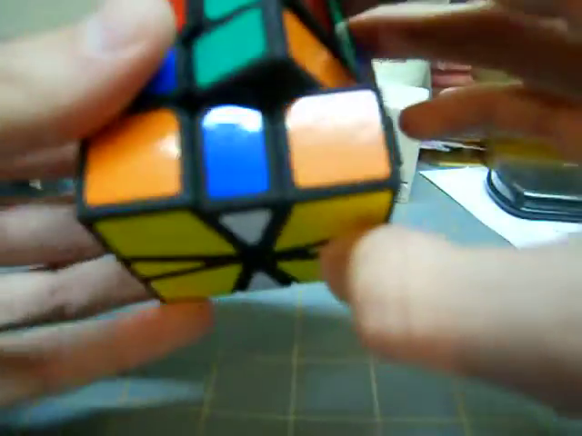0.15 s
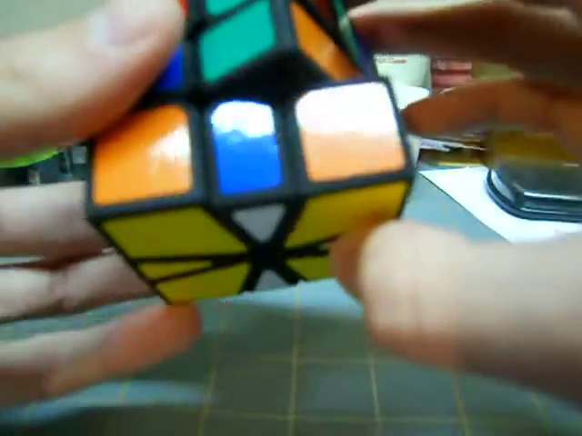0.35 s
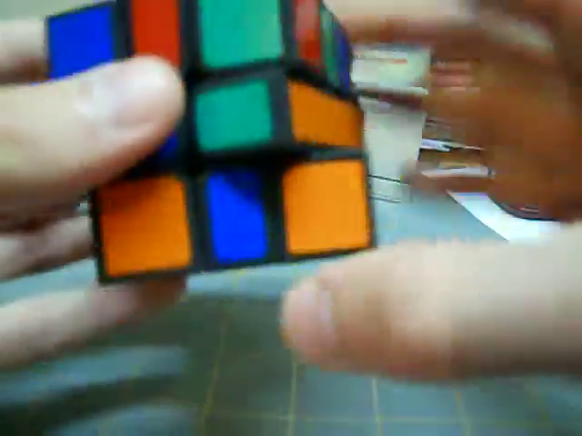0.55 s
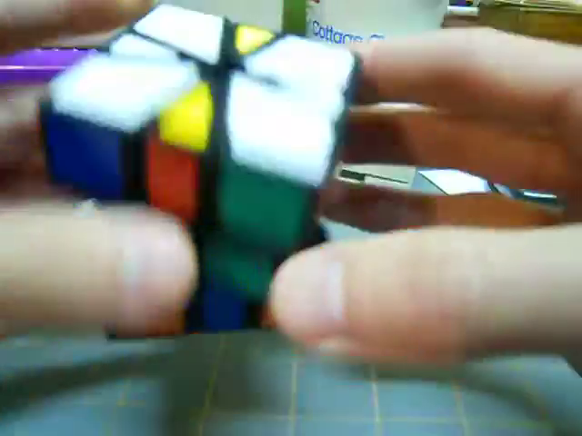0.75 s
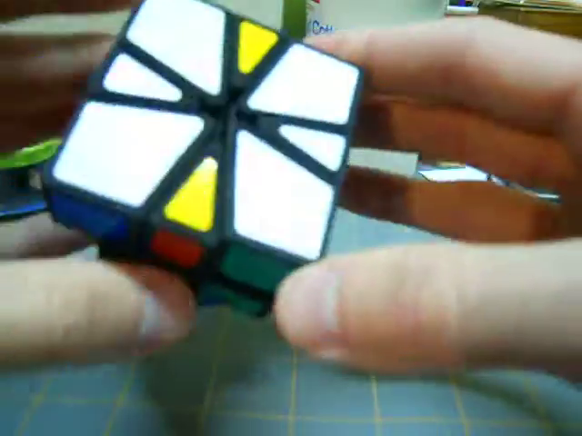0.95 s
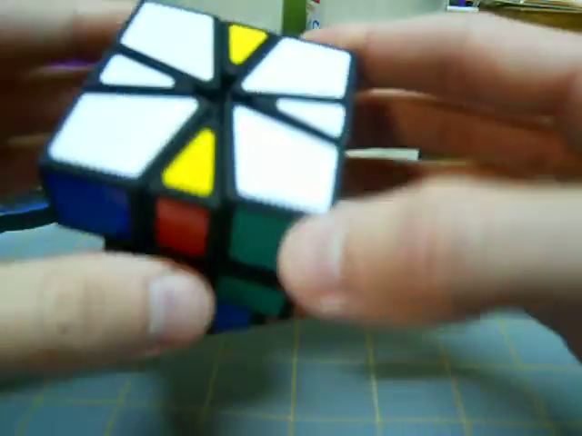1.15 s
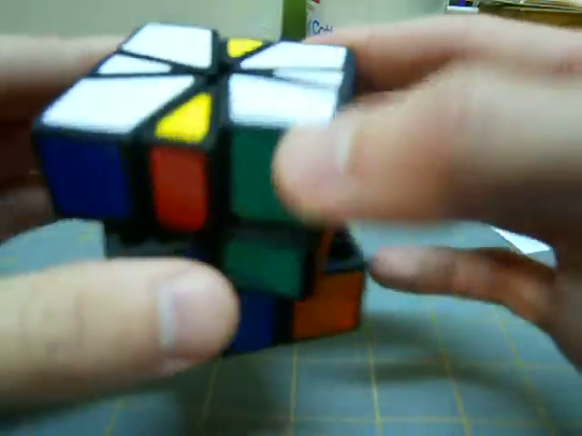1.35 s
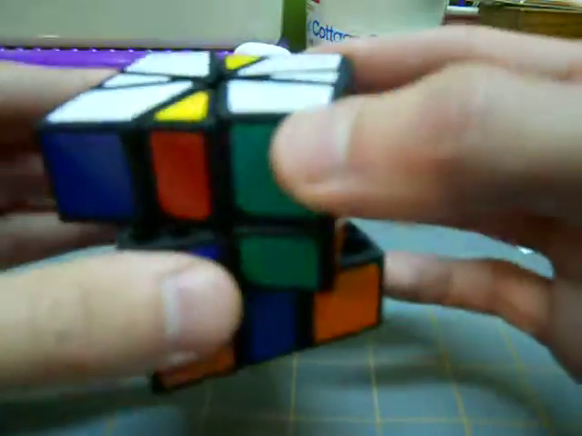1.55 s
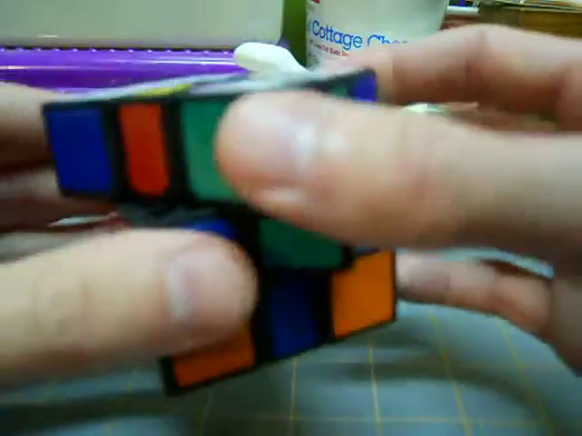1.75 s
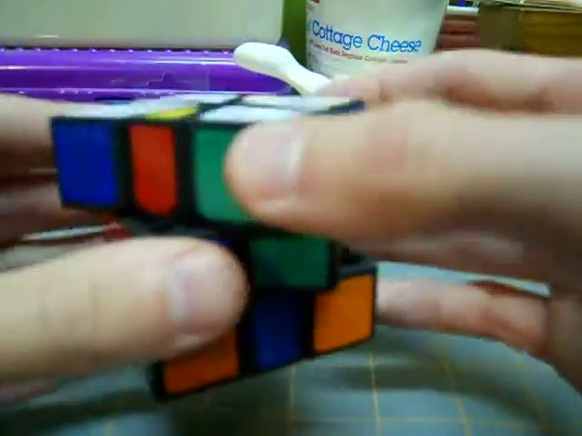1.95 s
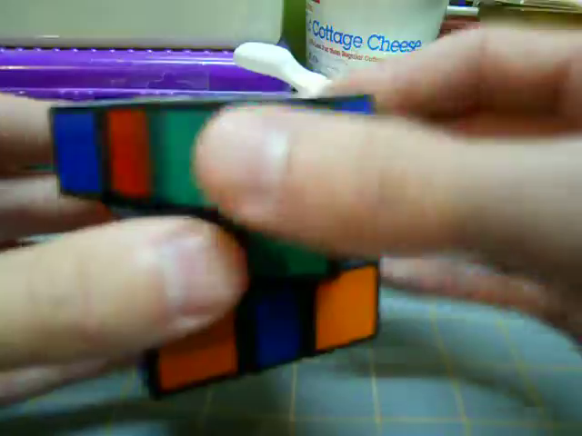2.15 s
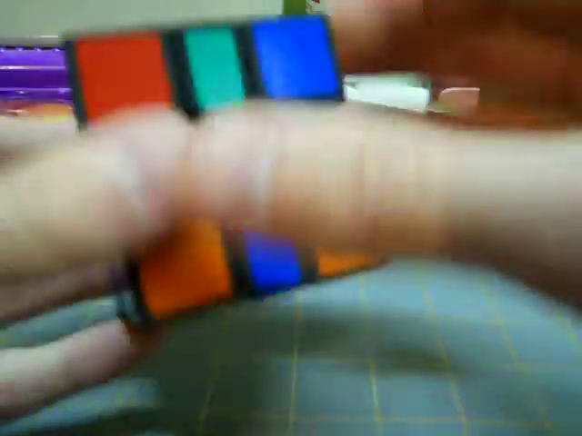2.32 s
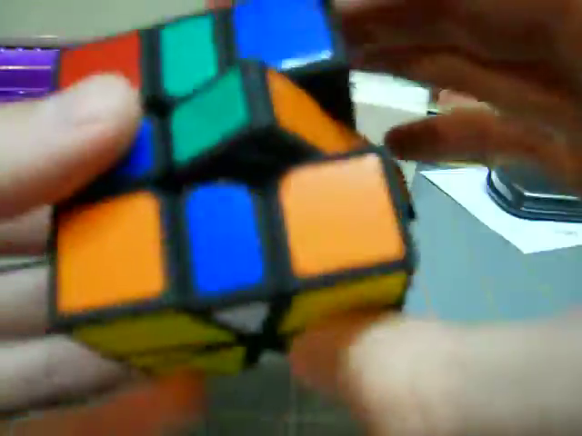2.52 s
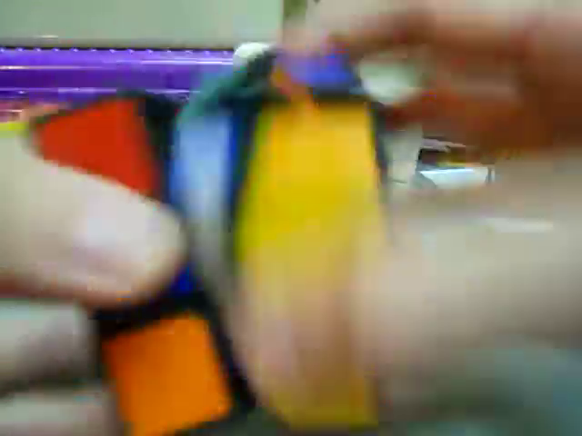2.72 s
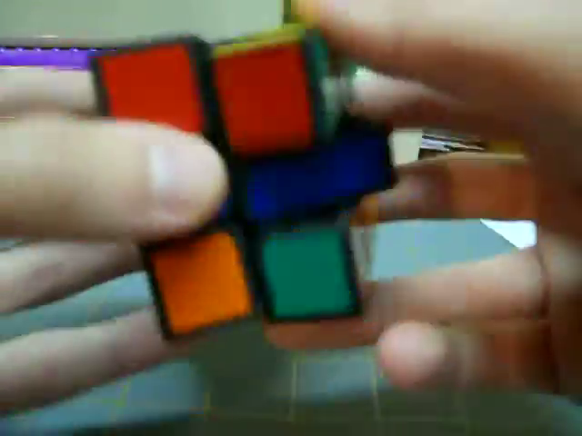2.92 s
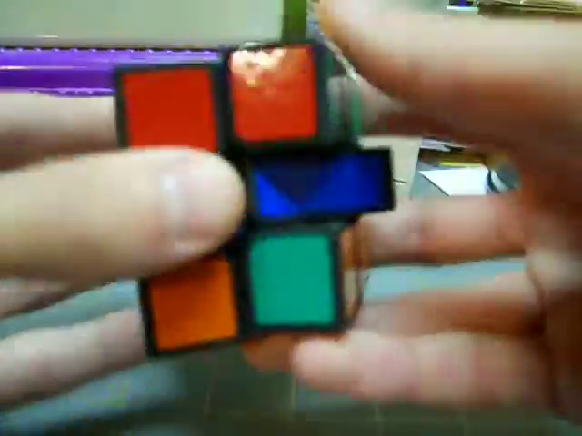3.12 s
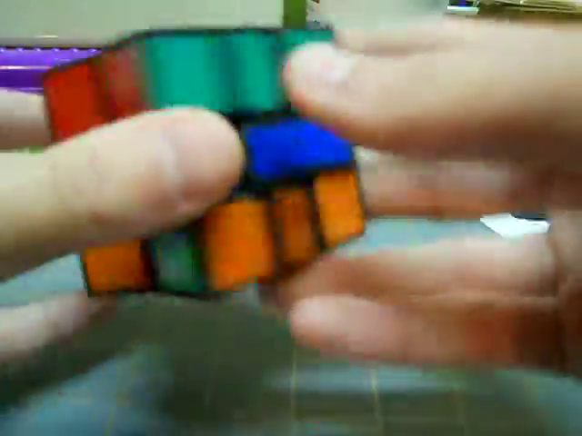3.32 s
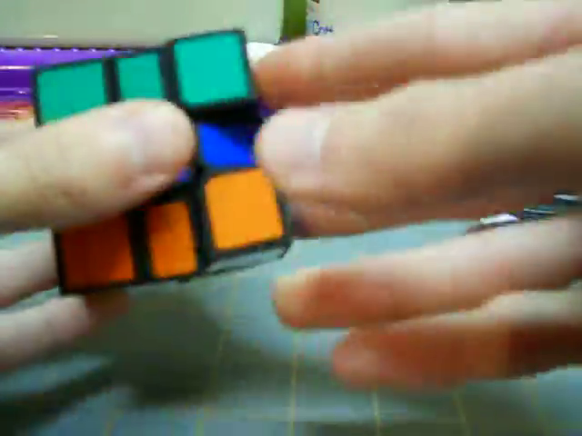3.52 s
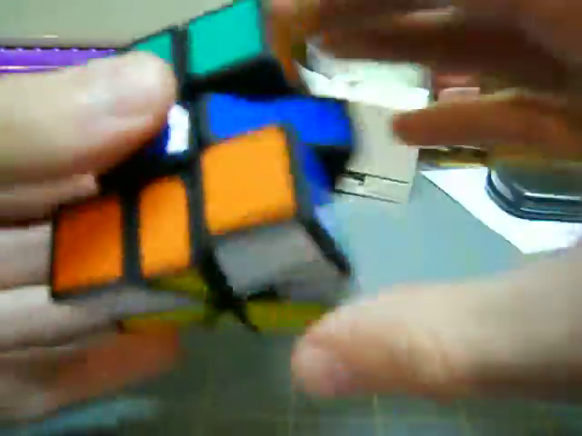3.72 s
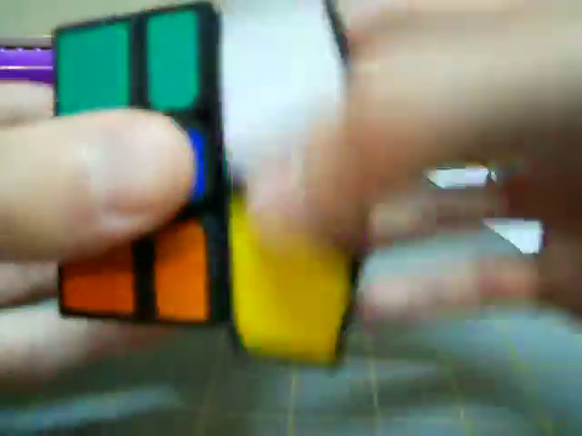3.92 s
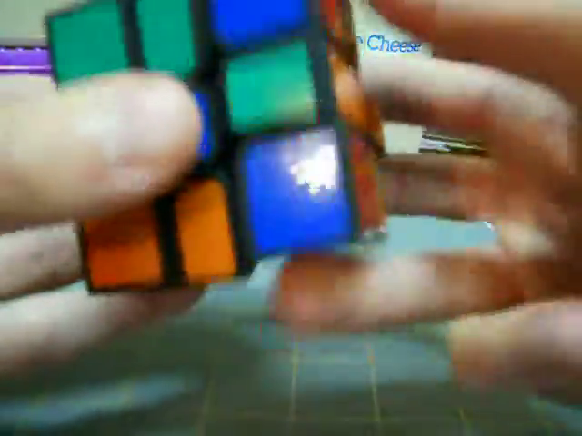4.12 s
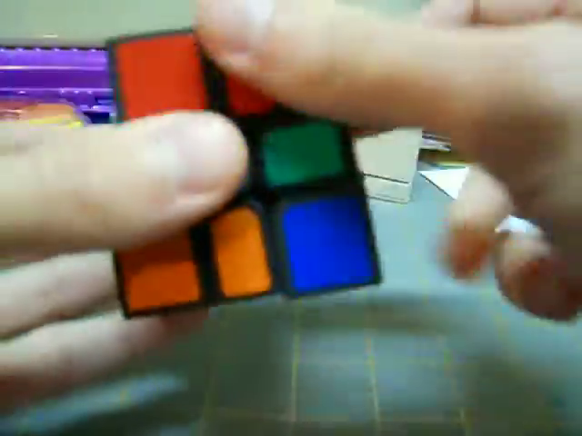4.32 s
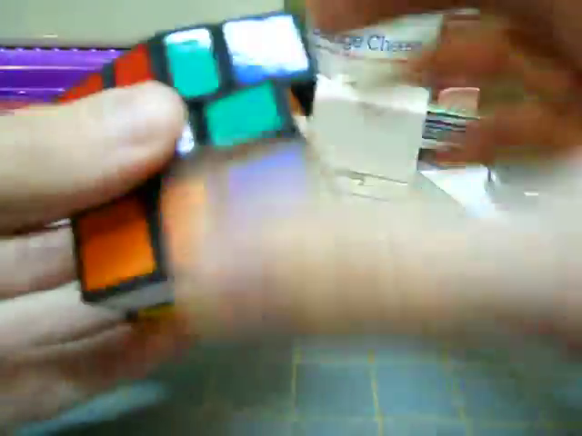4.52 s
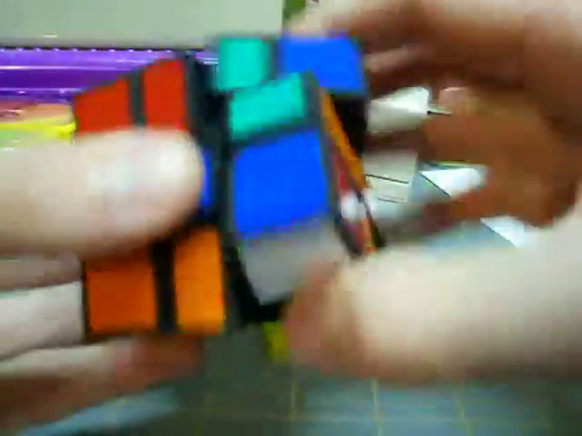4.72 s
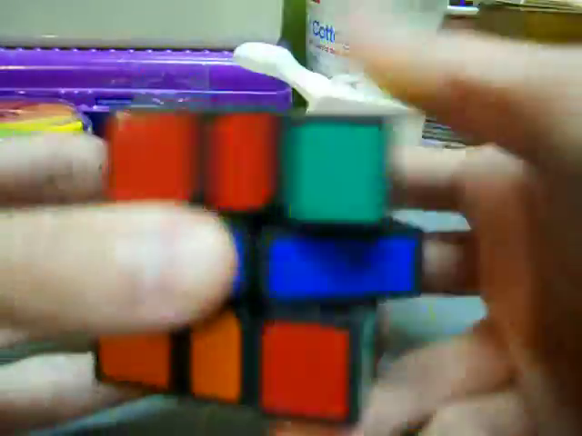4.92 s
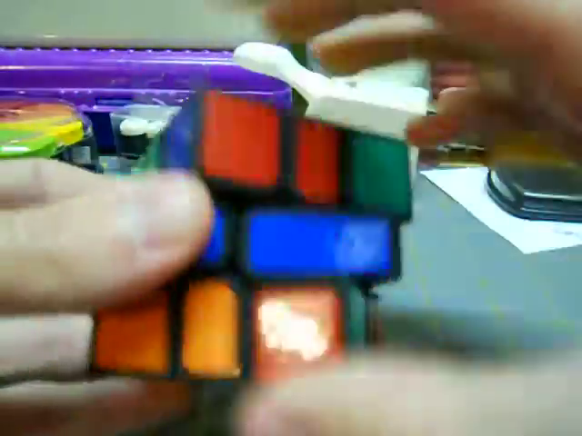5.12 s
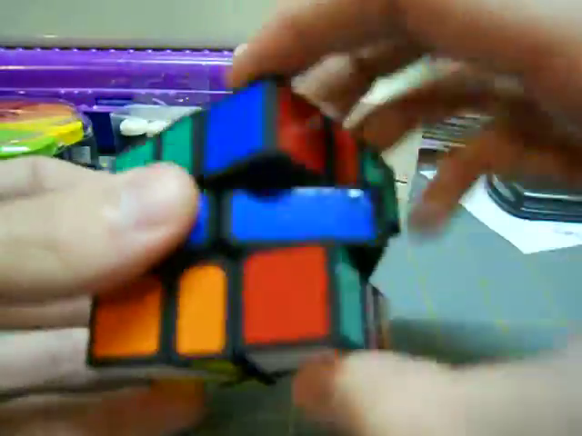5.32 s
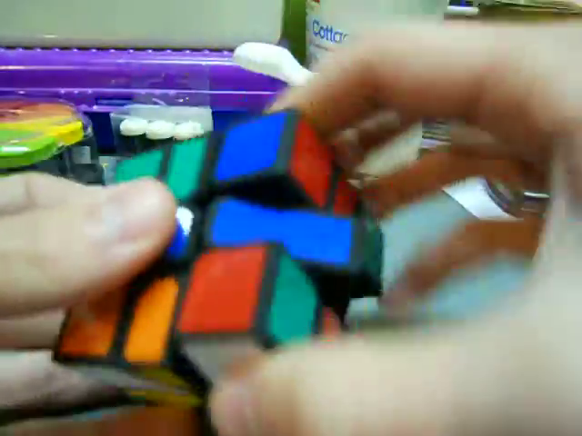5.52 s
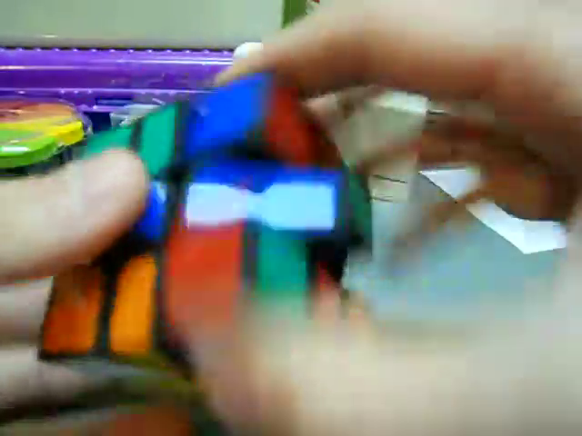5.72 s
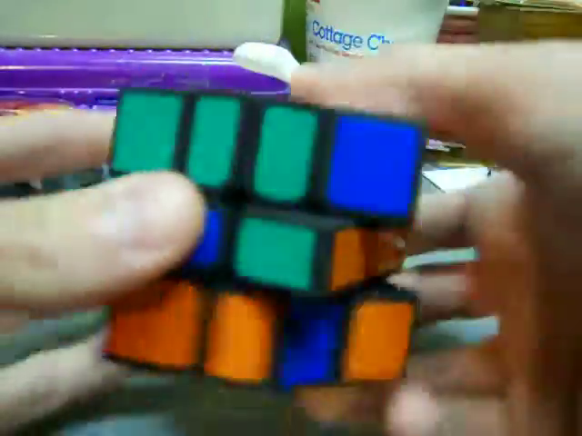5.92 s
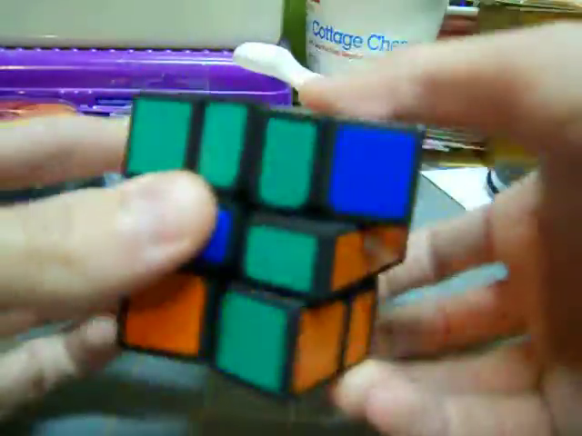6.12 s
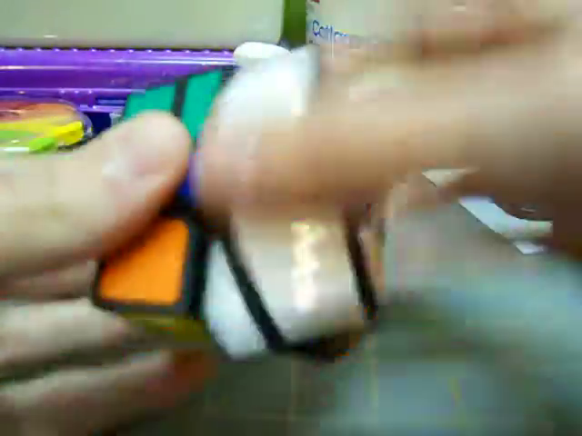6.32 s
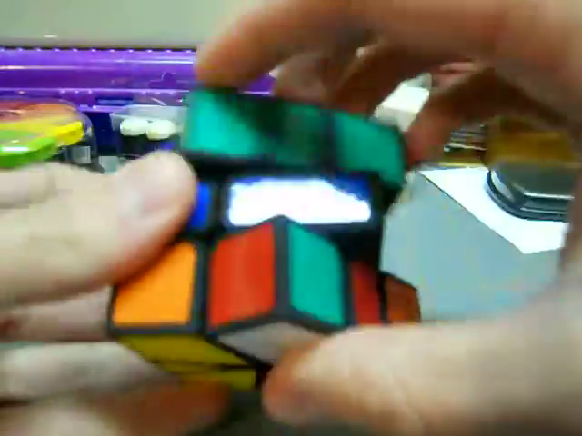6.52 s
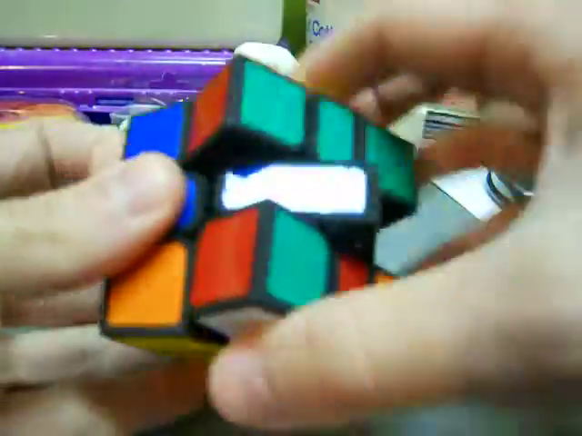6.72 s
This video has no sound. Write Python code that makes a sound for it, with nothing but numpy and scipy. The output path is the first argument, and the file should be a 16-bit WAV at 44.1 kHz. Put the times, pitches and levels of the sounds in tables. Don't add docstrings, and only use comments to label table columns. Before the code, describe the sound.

A hollow plastic twisty puzzle is turned by hand, quiet ticks growing into rapid scrapes, clacks and sharp snaps over faint, shifting hiss and hum.

```python
import sys
import numpy as np
from scipy import signal
from scipy.fft import rfft, irfft, next_fast_len
from scipy.io import wavfile
from scipy.ndimage import uniform_filter1d, map_coordinates

SR = 44100
rng = np.random.default_rng(int(sys.argv[2]) if len(sys.argv) > 2 else 0)


def decibels_to_gain(level_db):
    exponent = np.asarray(level_db, float) / 20
    return 10 ** exponent


def inscribe(sig):
    pcm = np.round(np.clip(np.atleast_2d(sig).T, -1, 1) * 32767)
    wavfile.write(sys.argv[1], SR, pcm.astype(np.int16))


N = 298116

# time_s, level_db
GAIN = [(0, -69.5), (0.45, -72), (0.68, -67.5), (0.92, -60), (1.6, -58.5), (2.11, -57.5), (2.33, -62),
        (2.61, -61.5), (2.941, -66), (3.5, -65.5), (4.1, -66.5), (4.54, -63), (4.86, -61), (5.33, -62.5),
        (5.55, -64.5), (6.12, -66), (6.76, -66.5)]
# frequency_hz, level_db
BAND = [(300, -10.5), (900, 0), (7500, -1), (8000, -17.5), (8500, -15.5), (8950, -30.5), (9200, -44.5),
        (9450, -90)]


def unit(x):
    return x / np.sqrt(np.mean(x ** 2) + 1e-20)


def along(points, hz):
    f, value = np.transpose(points)
    return np.interp(np.log(hz + 1), np.log(f + 1), value)


def wobble(rate_hz):
    knots = rng.standard_normal(N // 20 + 4)
    return map_coordinates(knots, [np.arange(N) * min(rate_hz, 2000) / SR])


def filtered(x, response):
    size = next_fast_len(N + 8192)
    return irfft(rfft(x, size) * response(np.fft.rfftfreq(size, 1 / SR)), size)[..., :N]


def ring(x, modes):
    def bank(f):
        total = 0
        for k, (centre, width, db) in enumerate(modes):
            resonance = 1j * f * width / (centre * centre - f * f + 1j * f * width)
            total = total + (-1) ** k * decibels_to_gain(db) * resonance
        return total / np.sqrt(np.mean(abs(total) ** 2))
    return filtered(x, bank)


def floor():
    # frequency_hz, density_db_per_hz
    hiss_spectrum = [(20, -7), (60, -7), (200, -8.5), (700, -9), (2000, -13), (4000, -14.5), (7400, -17.5)]
    # frequency_hz, width_hz, level_over_floor_db
    hum_hz, hum_width_hz, hum_db = (62, 4.3, 1.1)
    hum_growth = 1.3
    t = np.arange(N) / SR
    gain_s, gain_db = np.transpose(GAIN)
    hiss = unit(filtered(rng.standard_normal(N), lambda f: decibels_to_gain(along(hiss_spectrum, f))))
    hiss_level = decibels_to_gain(13.5 + 0.9 * wobble(7.9))
    beat = np.sin(2 * np.pi * hum_hz * t + .4 * wobble(hum_width_hz))
    extra_db = (hum_growth - 1) * np.interp(t, gain_s, gain_db - gain_db.mean())
    hum = decibels_to_gain(hum_db + extra_db + .6 * wobble(6.5)) * beat
    return decibels_to_gain(np.interp(t, gain_s, gain_db)) * (hiss_level * hiss + hum)


def desk(x):
    t = np.arange(SR // 5) / SR
    tail = rng.standard_normal(len(t)) * decibels_to_gain(-60 * t / 0.098)
    return signal.fftconvolve(x, tail / np.linalg.norm(tail))[:N]


def body(force, hollow, edges):
    # time_s, thin_walls_db, edges_db, broad_walls_db, deep_cavities_db
    tilt = [(0.05, -2, -0.5, -2, 3.5), (.9, 0, 5, 4, -0.5), (1.6, 3, 0.5, -1, 2.5),
            (1.77, 0.5, 2, -2.5, 5.5), (2.24, 2.5, 1, -3, -3.5), (2.57, -2.5, 0, 4, 8.5),
            (2.79, -1.5, -1.5, 1, -4.5), (2.88, 0, -1.5, 0.5, -3), (3.37, -0.5, 1, -0.5, 2),
            (3.95, -0.5, -2, 0, -2), (4.29, 2, 2, 1.5, -1.5), (4.45, -5, -5.5, -5.5, 4),
            (4.87, 0, 0.5, 1.5, -6.5), (5.3, -2, 0, -2, 0), (5.6, -1.5, 0.5, -3, -2.5),
            (5.85, -3, -1, -4, -2.5), (6.08, 0.5, 5.5, 4, -1), (6.4, 0, 0.5, 1, -4.5)]
    # frequency_hz, width_hz, level_db
    cavity_modes = [(393, 320, -16), (621, 149, -6.5), (892, 192, -5), (1224, 344, -2), (1420, 240, 3),
                    (1900, 1140, -11.5)]
    thick_modes = [(2380, 680, -5), (3097, 450, 1.5)]
    thin_modes = [(3726, 530, 1), (4160, 723, -3)]
    edge_modes = [(4830, 2230, -4.5), (6510, 840, 0), (7630, 3240, -9)]
    time_s, *free_db = np.transpose(tilt)
    thin, fine, broad, deep = (decibels_to_gain(np.interp(np.arange(N) / SR, time_s, db)) for db in free_db)
    walls = ring(decibels_to_gain(-6.0) * broad * force, thick_modes[:1])
    walls = walls - decibels_to_gain(-0.3) * ring(force, thick_modes[1:])
    walls = walls + ring(decibels_to_gain(-4.0) * thin * force, thin_modes)
    cavities = ring(decibels_to_gain(-6.0) * deep * hollow, cavity_modes[:3])
    cavities = cavities - decibels_to_gain(-2.07) * ring(hollow, cavity_modes[3:])
    return walls + cavities + ring(fine * edges, edge_modes)


def snaps():
    # start_s, peak_db, pitch_hz, t60_ms
    blows = [(2.2084, -25, 3890, 12), (2.2419, -7.5, 4060, 11), (2.5706, -19.5, 2780, 19),
             (2.7568, -24, 3160, 12), (2.8923, -20, 3350, 12), (3.2737, -22, 3050, 12),
             (3.3852, -24.5, 2960, 12), (3.4851, -19, 2810, 13), (3.4977, -20.5, 3000, 12),
             (3.9357, -24, 3120, 12), (3.9468, -11, 2950, 12), (3.9594, -16.5, 3130, 14),
             (3.9914, -16.5, 3080, 14), (4.0198, -24, 3000, 13), (4.1668, -18.5, 3200, 14),
             (4.2651, -16, 3060, 12), (4.2997, -17, 3860, 12), (4.4356, -10, 2950, 11),
             (4.4538, -15, 3020, 11), (5.7503, -41, 5200, 7.9), (4.7653, -23.5, 2780, 12),
             (4.8106, -16, 2420, 11), (4.8262, -17, 3030, 12), (4.8616, -8, 3310, 12),
             (4.8847, -5.5, 3150, 12), (.9115, -27, 3800, 14), (5.0509, -17, 3080, 10),
             (2.2612, -11.5, 3200, 12), (5.081, -20, 2990, 12), (5.1928, -24, 2520, 13),
             (5.5788, -23.5, 3300, 11), (5.5841, -23, 2890, 11), (5.6574, -26.5, 2900, 12),
             (5.6842, -20, 3000, 12), (5.6991, -19, 3000, 15), (5.7073, -27, 3880, 12),
             (5.8352, -13, 3250, 9.8), (5.8488, -11, 2800, 14), (5.9385, -15, 3280, 11),
             (5.9749, -21.5, 3100, 13), (4.9005, -6, 2900, 11), (6.3485, -15, 3060, 12),
             (6.3683, -13.5, 2700, 15), (6.3991, -16.5, 3030, 12), (6.4048, -8.5, 2770, 12),
             (6.4439, -18, 3040, 11), (6.5227, -26, 2970, 11), (3.542, -39, 473, 35),
             (1.681, -34, 1370, 22), (1.7491, -27.5, 1300, 27), (2.1903, -33, 856, 20),
              (2.57, -23, 1300, 15), (2.7735, -23, 1270, 26), (2.7915, -20, 1350, 17),
              (2.86, -21.5, 1460, 24), (3.444, -24, 1340, 19), (3.3788, -30, 1420, 11),
              (3.426, -21, 2400, 16), (3.913, -26, 1240, 18), (4.0017, -27, 1370, 22),
              (4.318, -28, 1420, 23), (4.348, -23.5, 1470, 21), (4.793, -32, 1550, 17),
              (4.812, -22, 1630, 24), (4.89, -27, 1410, 20), (4.907, -28, 1410, 20),
              (5.167, -34, 1410, 9.1), (6.5388, -23, 1445, 32), (3.9503, -17, 3700, 19),
              (5.8663, -13, 4020, 13), (5.6566, -33, 1410, 18), (5.8785, -17.5, 1740, 26),
              (5.8937, -21, 1420, 20), (6.33, -26, 1510, 27), (6.3742, -19, 1660, 31),
              (6.4, -22.5, 1570, 26), (6.4397, -25, 1400, 25), (6.472, -19, 1430, 18),
             (.047, -52, 800, 34), (0.2244, -49, 1250, 27), (0.2267, -40, 2840, 13),
             (.3196, -41.5, 3580, 10), (.4874, -36, 3160, 13), (.5036, -39, 2710, 14),
             (.5046, -45, 1010, 17), (0.7478, -33, 1210, 14), (.7474, -33, 2950, 8.9),
             (0.771, -37, 854, 16), (.9106, -32, 1460, 27), (.9191, -39, 1090, 17), (1.766, -31, 840, 16),
             (2.238, -24.5, 890, 53), (2.2412, -22, 1160, 22), (3.2718, -30, 640, 17),
             (3.8226, -35.5, 810, 20), (3.8461, -39, 3020, 10), (3.9212, -10.5, 3160, 14),
             (4.7307, -13, 3200, 11), (4.735, -16, 2380, 15), (4.869, -10, 3500, 12),
             (4.8791, -9, 2990, 9.9), (4.9102, -7.5, 3270, 8.7), (4.712, -36.5, 240, 60),
             (5.3391, -29.5, 3400, 12), (5.3543, -32, 4100, 8), (5.3828, -27, 3870, 12.4),
             (5.4688, -20, 3940, 11), (5.4728, -26, 3130, 20), (5.4981, -37, 757, 25),
             (5.5959, -20, 915, 26), (5.5966, -33.5, 460, 41), (5.5963, -10.5, 5180, 11),
             (5.5989, -8.5, 2634, 21), (5.6015, -18.5, 1670, 22), (6.0874, -17.5, 4120, 21),
             (6.098, -24, 3320, 9.3), (6.61, -34, 700, 33), (6.7177, -26.5, 1400, 10),
             (6.7188, -31, 2800, 13)]
    # pitch_multiple, level_db
    overtones = [(1, 1), (1.47, -13.5), (2.13, -16.5)]
    damping, attack_ms = .7, .35
    out = np.zeros(N + SR)
    ms = np.arange(SR // 35) / SR * 1000
    for start_s, peak_db, pitch_hz, t60_ms in blows:
        tone = 0
        for multiple, level_db in overtones:
            decay = decibels_to_gain(level_db - 60 * multiple * ms / (damping * t60_ms))
            tone = tone + decay * np.sin(2 * np.pi * multiple * pitch_hz * ms / 1000)
        attack = 1 - np.exp(-ms / attack_ms)
        out[round(start_s * SR):][:len(ms)] += decibels_to_gain(peak_db + 4) * attack * tone
    return out[:N]


def ticks():
    # start_s, level_db, hollow_tone_db, rise_ms
    clacks = [(2.2627, -14.5, -33, 20), (2.7645, -15, -10, 2.5), (2.7797, -12.5, -17, 9.4),
              (2.7904, -10.5, -31, 4.8), (2.8621, -18.5, -8, 9.2), (2.8765, -15, -21.5, 8.6),
              (3.4275, -21.5, -13, 5.2), (3.4575, -22.5, -5, 12), (3.9162, -13, -12.5, 2),
              (4.0535, -14.5, -30, 6.1), (4.2829, -9.5, -23, 1.4), (4.4369, -30.5, -3, 7),
              (4.4432, -14.5, -22, 3.2), (4.7347, -22.5, -5.5, 6.8), (4.9245, -16.5, -13, 3.1),
              (5.261, -16, -10, 9.4), (5.5975, -10, -17.5, 3.4), (5.7855, -10.5, -16, 1.8),
              (5.7995, -14.5, -18, 4.5), (5.829, -14, -23, 13), (5.8625, -13, -4, 6.4),
              (5.879, -15, -10.5, 3.9), (5.889, -6, -20, 2.9), (6.3656, -27, -27, 5.5),
              (6.3905, -20, -4, 13), (6.4024, -31, 18, 1.5), (6.4238, -11.5, -10.5, 3.3),
              (6.4675, -29.5, 1, 5.4), (6.5395, -18.5, -5, 2.6), (6.5621, -24, -4, 20)]
    edge_ticks = [(.7475, -23.5, -8, 2.57), (1.341, -24.5, -42, 2.3), (1.5719, -28, -9, 3.4),
                  (1.9112, -30, -14, 2.9), (2.638, -24.5, -12, 2.5), (2.67, -24.5, -4, 5.1),
                  (3.134, -34.5, -6, 2.1), (3.1778, -38, -26, 2.7), (3.3863, -19, -9, 7.5),
                  (3.5457, -29, -12, 2), (3.6478, -29.5, -9, 3.2), (3.9936, -23, -18, 1.9),
                  (4.1685, -34.5, 1, 10), (4.3717, -28, 2, 1.9), (4.381, -43, -8, 2.2),
                  (4.5328, -28.5, -13, 6.4), (4.577, -30.5, -1.5, 1.8), (4.7504, -19, 2.5, 1.7),
                  (5.0514, -28, 4, 8), (5.1675, -21.5, 5.5, 2.54), (5.187, -28, 1, 2.5),
                  (5.3852, -28, -1, 4.7), (5.3979, -20.5, -6, 2.2), (5.4174, -21, -28, 1.6),
                  (5.4397, -11.5, -15, 1.7), (5.457, -22, -10, 2.2), (5.684, -25, 2, 1.9),
                  (5.738, -26, -6.5, 1.7), (5.9535, -24.5, -6, 18), (6.177, -35.5, -1, 3.7)]
    taps = [(.012, -38, -13, 3.2), (.2115, -40, -7, 2.8), (.2218, -45, -14, 2), (.3165, -48, -4, 8.2),
            (.4879, -43.5, 0, 2), (.5043, -41.5, -6, 2.5), (.7695, -45, 0, 4.1), (1.459, -38.5, 3, 9.6),
            (1.6696, -37, -2.5, 4.5), (1.8593, -32.5, -17, 2.1), (2.3487, -43.5, 5.5, 2.2),
            (2.4138, -40.5, -4.5, 12), (2.5702, -33, -11, 4.7), (2.9939, -37, 10, 1.9),
            (3.0525, -36, -1, 2), (3.0915, -34.5, -2, 2.3), (3.8237, -30, -2.5, 3.8), (3.8602, -36.5, 0, 3),
            (3.883, -36.5, -6, 8.9), (4.7004, -20.5, -9.5, 2.2), (5.0816, -25, -4, 11),
            (5.3136, -36, -13, 2.5), (5.3394, -40, -23, 2.2), (5.4998, -33, 0, 7.1), (5.5454, -42, -3, 4.1),
            (5.5752, -30.5, 2, 2), (6.136, -44, -11, 5.8), (6.2415, -28.5, -1, 20), (6.66, -46, -5, 7.2),
            (6.7175, -35.5, 2, 3.6)]
    creaks = [(.1148, -53, -7, 2.5), (.9251, -51, -4, 4.6), (1.8991, -30.5, -5, 2.5),
              (2.2481, -10.5, -22, 1.68), (2.3281, -39.5, 0, 2.2), (2.5451, -43, 1.5, 5.6),
              (2.8176, -14.5, -3, 4), (3.2028, -30.5, -7, 6.9), (3.6294, -46, 2, 6.4),
              (3.8747, -41, -12, 2.8), (4.5541, -37.5, -7, 7.7), (4.5845, -39, -15, 4.8),
              (4.6111, -45.5, -2, 4.4), (4.8021, -17, -20, 1.8), (4.8425, -21.5, -12, 2.8),
              (5.2261, -32, -18, 5.3), (5.3551, -33, -7, 3), (5.5651, -44, 4, 3), (5.5851, -42, -5, 3.9),
              (5.7514, -47, -12, 3), (5.8361, -13, -13, 4.5), (6.0756, -24.5, -20, 3),
              (6.1001, -22, -6.5, 6.6), (6.4701, -15.5, -9, 1.7), (6.6031, -28.5, -2, 10)]
    # fall in ms, level in dB that reaches the thin edges
    kinds = ((clacks, 3.34, -5), (edge_ticks, 2.64, -9.5), (taps, 4, -6.5), (creaks, 3.2, -5.5))
    after_db, after_db_per_ms = -12.5, 0.5
    force, lead = np.zeros((3, N + SR)), SR // 50
    ms = np.arange(-lead, lead) / SR * 1000
    rows = [(*row, fall_ms, edge_db) for kind, fall_ms, edge_db in kinds for row in kind]
    chance = rng.standard_normal((len(rows), 3, len(ms)))
    for (start_s, level_db, hollow_db, rise_ms, fall_ms, edge_db), noise in zip(rows, chance):
        span = np.where(ms < 0, rise_ms - 2.2, fall_ms - 2.2 + 0.21 * rise_ms)
        span = np.maximum(span, .15)
        shape = decibels_to_gain(-5.5 * (abs(ms) / span) ** 1.64)
        shape = shape + (ms > 0) * decibels_to_gain(after_db - after_db_per_ms * abs(ms))
        rattle = shape * (noise + 0.12 * noise[0])
        rattle[:, lead] += 6.5
        rattle *= np.linalg.norm(shape) / np.linalg.norm(rattle, axis=1, keepdims=True)
        part_db = level_db + np.array([[.1], [hollow_db], [edge_db]])
        force[:, round(start_s * SR):][:, :len(ms)] += decibels_to_gain(part_db) * rattle
    early = lead + SR // 1500
    return decibels_to_gain(-3.5) * body(*force[:, early:early + N])


def strokes(t):
    # peak_s, build_up_s, lasts_s, scrape_db, hollow_tone_db
    turns = [(.06, 0.28, 0.018, -47, -11), (.911, 0.0058, 0.0095, -38, 0.5),
             (1.35, 0.052, 0.046, -48.5, 1.5), (1.83, .1, 0.058, -58, -20), (1.938, .013, 0.032, -46, -3.5),
             (2.012, 0.041, 0.063, -41, -6), (2.255, 0.074, 0.011, -17.5, -3.5),
             (2.69, 0.038, 0.1, -34.5, -6.5), (2.766, 0.043, 0.027, -24, -4),
             (2.869, 0.048, 0.056, -31, -5), (3.4, 0.017, 0.14, -30.5, -4.5),
             (3.92, 0.017, 0.12, -23.5, -8.5), (4.05, 0.05, 0.036, -21, -10.5),
             (4.709, 0.0065, 0.072, -39, 2), (4.79, 0.063, 0.15, -23, -7), (4.88, 0.086, 0.072, -20, -4.5),
             (5.46, 0.41, 0.0093, -51.5, 1), (5.655, 0.074, 0.0053, -32, -1),
             (5.782, 0.013, 0.13, -21, -10.5), (5.9, 0.11, 0.047, -26, -11.5),
             (5.976, 0.027, 0.056, -34.5, -2.5), (6.334, 0.064, 0.11, -25, -5),
             (6.47, 0.18, 0.0093, -26, -7.5), (6.605, .06, 0.036, -39, -1.5)]
    flicks = [(.53, 0.03, 0.013, -53.5, -11), (1.609, 0.058, 0.044, -42.5, -2.5),
              (1.76, 0.083, 0.098, -31.5, -8), (2.571, 0.01, 0.016, -31, -9.5),
              (2.999, 0.046, 0.03, -31, -2.5), (3.199, 0.065, 0.048, -41.5, -2.5),
              (3.275, 0.07, 0.061, -31.5, -5), (3.376, 0.076, 0.013, -27.5, -12),
              (3.57, 0.061, 0.023, -52, -9), (3.827, 0.0092, 0.053, -46.5, -4),
              (4.292, 0.071, 0.1, -24.5, -6.5), (4.452, 0.046, 0.036, -23.5, -10),
              (4.528, 0.046, 0.037, -40, -2), (4.993, 0.047, 0.059, -31.5, 1.5),
              (5.076, 0.093, 0.045, -34.5, 1), (5.179, 0.11, 0.047, -34, -1.5),
              (5.261, 0.023, 0.02, -25.5, -2.5), (5.469, 0.012, 0.025, -33.5, -1),
              (5.598, 0.014, 0.022, -27, -3.5), (5.696, 0.026, 0.032, -29.5, -3.5),
              (5.75, 0.046, .05, -57, -5), (6.086, 0.057, 0.021, -22.5, -7.5), (6.237, 0.083, 0.02, -40, 6),
              (6.556, 0.15, 0.047, -33.5, 0)]
    # peak_s, then as above
    rubs = [(.841, .08, .045, -56.5, 1), (1.723, .011, 0.012, -36.5, -10),
            (2.176, 0.014, 0.037, -36.5, -5.5), (2.643, .011, 0.019, -40.5, -2.5),
            (2.798, .05, 0.015, -16, -9.5), (3.351, 0.048, 0.02, -29.5, -6), (4.086, 0.054, 0.02, -35, -7),
            (4.216, 0.014, .065, -42, 0.5), (4.84, 0.043, 0.023, -21, -9), (5.311, .015, 0.196, -45.5, -9),
            (5.771, 0.012, 0.02, -28.5, -7.5), (6.136, .01, 0.02, -47.5, 1), (6.196, .01, 0.026, -44.5, 2),
            (6.651, .03, 0.0096, -43, -5), (6.74, 0.11, .03, -51.5, -3)]
    build_db, stop_db_per_s = 23, 1801
    rest_db = -10
    gain_s, gain_db = np.transpose(GAIN)
    power = np.tile(decibels_to_gain(2 * (np.interp(t, gain_s, gain_db) + rest_db)), (2, 1))
    for rows, sag_db in ((turns, 4.5), (flicks, 17), (rubs, -0.3)):
        for peak_s, build_s, lasts_s, scrape_db, hollow_db in rows:
            peak = round(peak_s * SR)
            near = slice(max(peak - SR // 2, 0), peak + SR // 4)
            u = t[near] - peak_s
            loss_db = build_db * np.maximum(-u, 0) / build_s
            loss_db = loss_db + sag_db * np.clip(u / lasts_s, 0, 1)
            loss_db = loss_db + stop_db_per_s * np.maximum(u - lasts_s, 0)
            power[:, near] += decibels_to_gain(2 * (scrape_db - loss_db + np.array([[0], [hollow_db]])))
    return np.sqrt(power)


def slips(clump):
    catch_db = np.minimum(2.8 * rng.exponential(size=N), 14)
    return unit(clump * decibels_to_gain(catch_db) * rng.standard_normal(N))


def drifting(x, depth_db):
    z = signal.stft(x, nperseg=256)[2]
    field = uniform_filter1d(rng.standard_normal(z.shape), size=3, axis=0)
    field = uniform_filter1d(field, size=18, axis=1)
    return signal.istft(z * decibels_to_gain(depth_db * unit(field)), nperseg=256)[1][:N]


def scrape():
    fine_db = -7.5
    walls, hollow = strokes(np.arange(N) / SR)
    grip = decibels_to_gain(1.0 * wobble(80) + 1.0 * wobble(300))
    snags = 10 * rng.uniform(-1, 1, N) * (rng.random(N) < 650 / SR)
    forces = []
    for push in (walls, hollow, decibels_to_gain(fine_db) * walls):
        forces.append(push * (slips(grip * decibels_to_gain(0.87 * wobble(150))) + snags))
    return drifting(body(*forces), depth_db=2.0)


def scene():
    puzzle = scrape() + ticks() + snaps()
    puzzle = puzzle + decibels_to_gain(-20) * desk(puzzle)
    puzzle = filtered(puzzle, lambda f: decibels_to_gain(along(BAND, np.minimum(f, 1000))))
    return (puzzle + floor())[None]


def band_limit(x):
    return signal.sosfilt(signal.butter(12, 9110, fs=SR, output="sos"), x)


def record(dry):
    x = dry / (1 + abs(dry / .65) ** 5) ** (1 / 5)
    x = filtered(x, lambda f: decibels_to_gain(along(BAND, np.maximum(f, 1000))))
    return band_limit(x)


dry = scene()
out = record(dry)
inscribe(out)
```